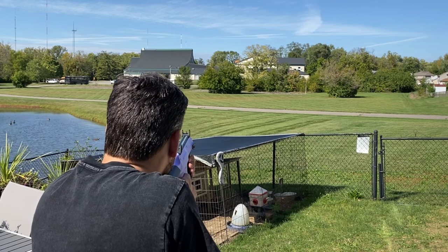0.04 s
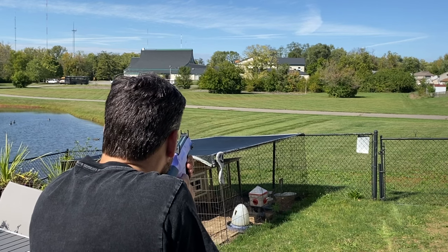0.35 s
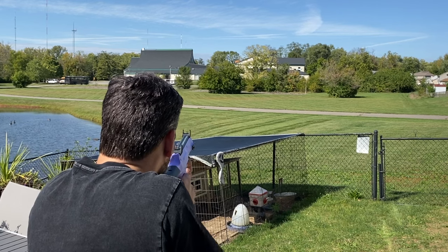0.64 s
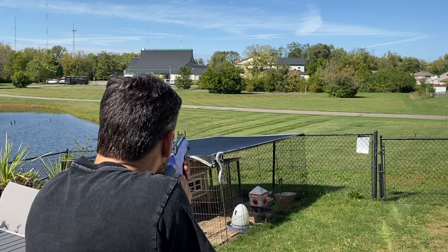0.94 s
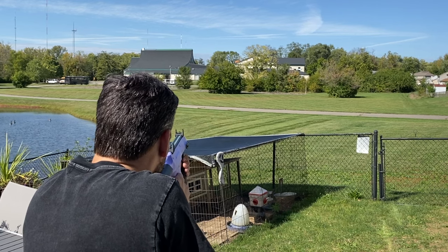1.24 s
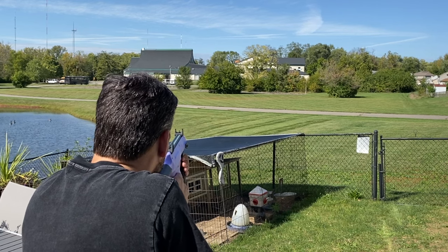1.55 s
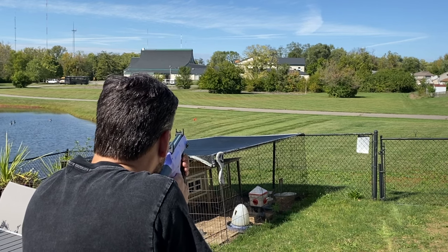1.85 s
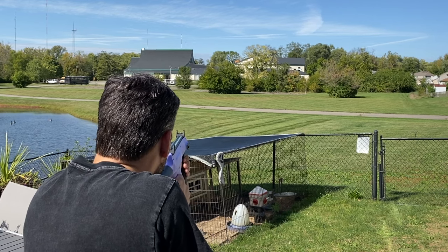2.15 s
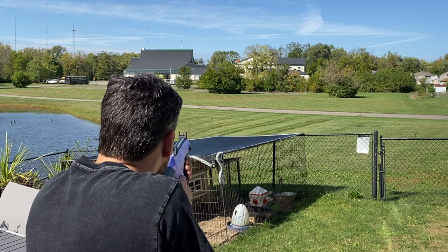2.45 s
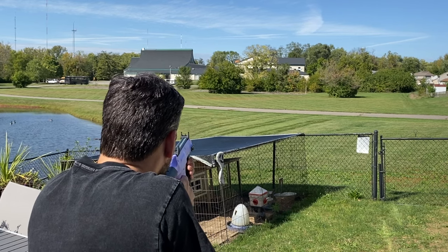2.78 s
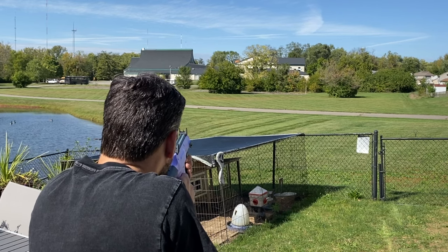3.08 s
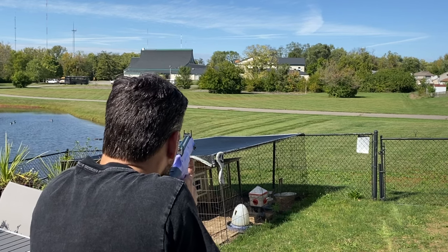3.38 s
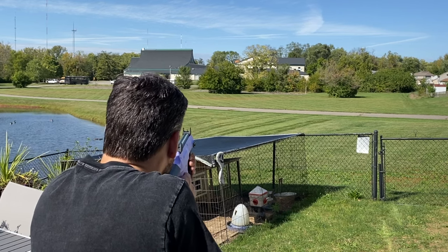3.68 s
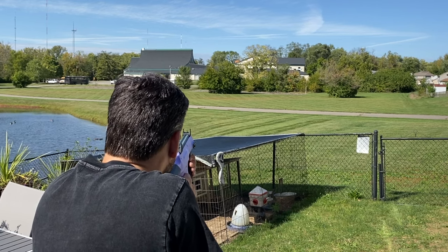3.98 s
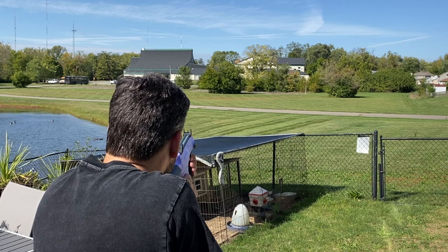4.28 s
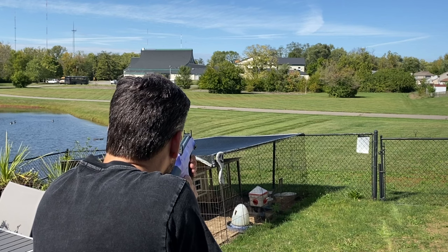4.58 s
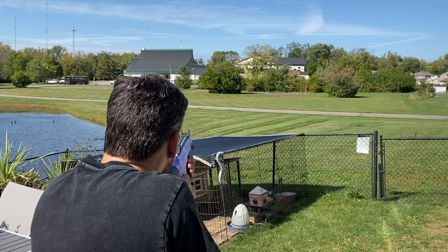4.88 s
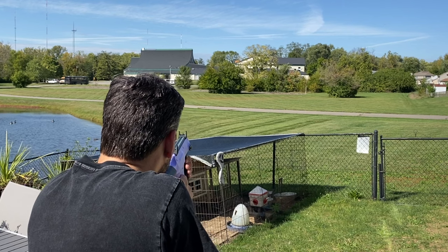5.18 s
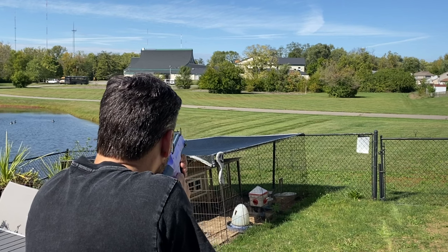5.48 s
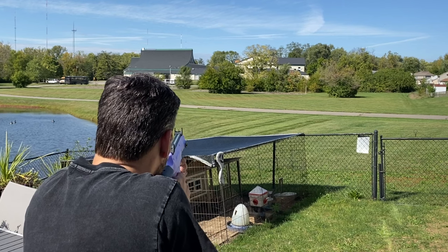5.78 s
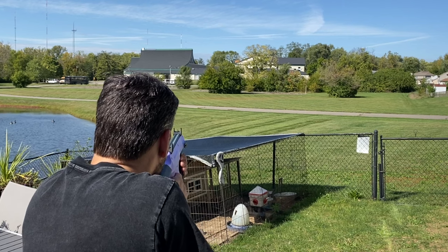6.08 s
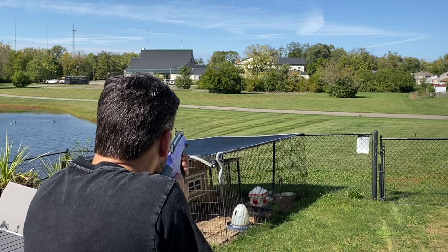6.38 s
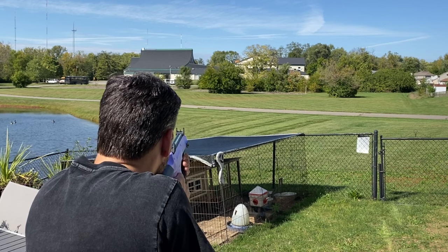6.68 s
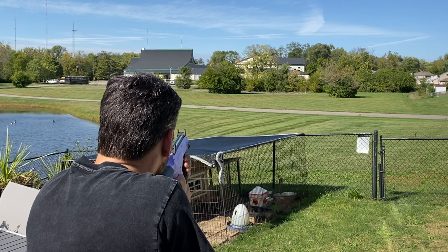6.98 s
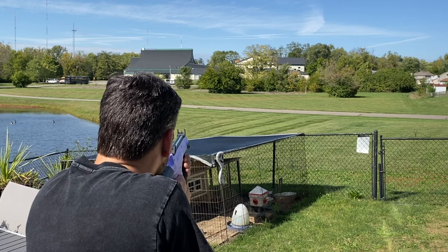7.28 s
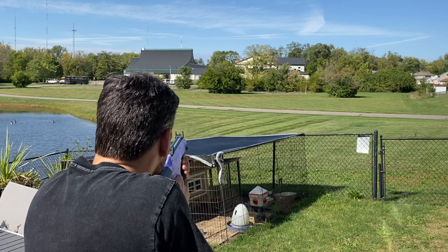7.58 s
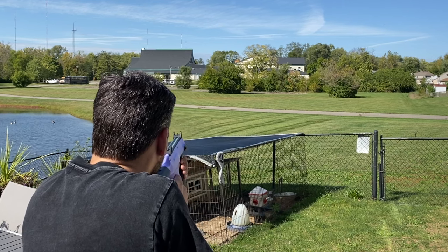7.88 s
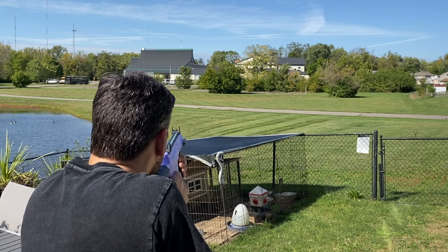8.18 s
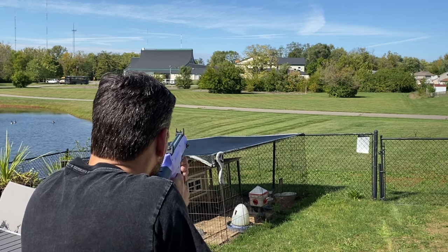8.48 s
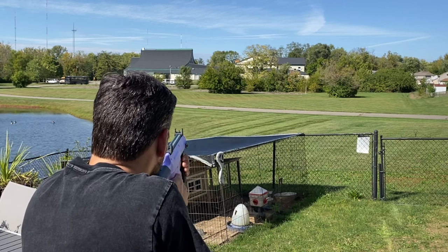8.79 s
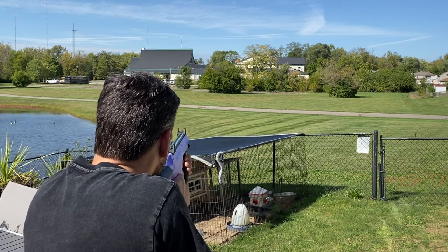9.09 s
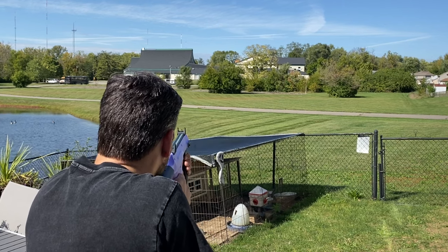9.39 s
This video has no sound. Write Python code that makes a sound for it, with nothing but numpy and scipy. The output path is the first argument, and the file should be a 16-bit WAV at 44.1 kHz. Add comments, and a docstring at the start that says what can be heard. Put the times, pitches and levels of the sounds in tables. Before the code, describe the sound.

Four rounds of a plastic toy blaster's slide clacking back and forward, each followed by a snapping, springy shot, outdoors.

```python
"""A spring-powered foam dart blaster is primed and fired four times, close by, on a quiet lawn.
Each time, the slide scrapes back, with a soft brush of the hand on the plastic, squeezes the spring
and latches. Two small catches click, and the slide runs home with a soft knock. On firing, the sear
(the catch that holds the spring) cracks free, the plunger thumps the hollow shell, and the spring
rattles and rings. After each of the first three shots, the trigger clicks back."""
import sys
import numpy as np
from scipy import signal
from scipy.fft import rfft, irfft
from scipy.io import wavfile
from scipy.ndimage import uniform_filter1d

SR = 44100
rng = np.random.default_rng(int(sys.argv[2]) if len(sys.argv) > 2 else 0)


def unload_audio(sound):
    """Save the sound as a 16-bit wav file, at the path given as the first command line argument."""
    columns = np.transpose(np.atleast_2d(sound))
    # keep every value between -1 and 1, then stretch to whole-number steps
    steps = np.round(np.clip(columns, -1, 1) * 32767)
    wavfile.write(sys.argv[1], SR, steps.astype(np.int16))


N = 425565


def gain_of(db):
    """Turns decibels into a number to multiply a sound by."""
    return 10 ** (np.asarray(db) / 20)


def unit_level(x):
    """Scales a signal to an average power of one."""
    return x / np.sqrt(np.mean(x ** 2) + 1e-20)


def level_at(tone, hz):
    """Joins the (f/Hz, level/dB) points of a tone curve with straight lines on a pitch scale."""
    f, db = np.transpose(tone)
    return np.interp(np.log(hz + 1), np.log(f + 1), db)


def add(mix, start, sound):
    """Lays a sound into the mix, starting at a time in seconds."""
    part = mix[max(round(start * SR), 0):][:len(sound)]
    part += sound[:len(part)]


def burst(hold, fall, tail_db=-26, tail=0.008, rise=0.00068):
    """Hard plastic parts chatter, then die away over faint nearby echoes; times are in seconds."""
    t = np.arange(SR // 10) / SR
    level = np.exp(-np.maximum(t - hold, 0) / fall) + gain_of(tail_db) * np.exp(-t / tail)
    level *= 1 - np.exp(-t / rise)
    chatter = rng.standard_normal(len(t)) * level
    # a hard hit feeds all frequencies about evenly
    flat = irfft(np.exp(1j * np.angle(rfft(chatter))), len(t))
    flat_level = np.sqrt(abs(uniform_filter1d(flat ** 2, size=64)) + 1e-15)
    return level * flat / flat_level


def stroke(rise, hold, fade_db_per_s, curve=1.3, tail_db=-30, tail_db_per_s=110):
    """The force on a sliding part builds, holds and fades, and loose parts whisper on."""
    t = np.arange(SR // 2) / SR
    build = np.minimum(t / rise, 1) ** curve
    fading = np.maximum(t - rise - hold, 0)
    return build * (gain_of(-fade_db_per_s * fading) + gain_of(tail_db - tail_db_per_s * fading))


def rub(force, slips_per_s, spread_db=2.5, hiss=0.39, uneven_db=1.9):
    """Rubbing is many tiny slips of uneven size over a smooth hiss; more force makes it louder."""
    noise, sign, grab = rng.standard_normal((3, SR))
    sizes = gain_of(spread_db * np.minimum(rng.exponential(1, SR), 3))
    slips = np.sign(sign) * sizes * (rng.random(SR) < slips_per_s / SR)
    # the surfaces grab and let go every few milliseconds
    grab_db = uneven_db * unit_level(uniform_filter1d(grab, size=140))
    friction = (unit_level(slips) + hiss * noise) * gain_of(grab_db)
    return unit_level(friction)[:len(force)] * force


def ring(notes, scatter_db=0, detune=0, low_hz=115):
    """A small struck body rings with little bass; each note falls 60 dB in its ring time."""
    t = np.arange(SR) / SR
    motion = np.zeros(SR)
    for hz, db, ring_s in notes:
        level_luck, pitch_luck = rng.standard_normal(2)
        level = gain_of(db + scatter_db * level_luck) * np.exp(-np.log(1000) * t / ring_s)
        motion += level * np.sin(2 * np.pi * hz * (1 + detune * pitch_luck) * t)
    return signal.sosfilt(signal.butter(2, low_hz, "highpass", fs=SR, output="sos"), motion)


# narrow bands that the plastic walls boost or weaken: f/Hz, width/Hz, level/dB
WALL_BANDS = [(1520, 65, 0), (2210, 240, 2.5), (2540, 140, 2.5), (2760, 140, -1), (4280, 310, 3.5),
              (4720, 160, 3.5), (5160, 180, 1.5), (7240, 270, 2), (6960, 390, 2.5), (7600, 200, 1.5),
              (8500, 260, 3), (9350, 160, 3.5)]

def colour(x, tone, peak_hz=1000, peak_db=0, octaves=0.9, size=4096):
    """Shapes a hit or rub by its tone curve, the broad peak of a small part, and the walls."""
    hz = abs(np.fft.fftfreq(size, 1 / SR))
    db = level_at(tone, hz) + peak_db * np.exp(-(np.log2((hz + 1) / peak_hz) / octaves) ** 2)
    db += sum(boost / (1 + (2 * (hz - centre) / width) ** 2) for centre, width, boost in WALL_BANDS)
    # a minimum-phase filter: nothing sounds before the hit
    response = np.exp(np.conj(signal.hilbert(np.log(gain_of(db)))))
    taps = np.fft.ifft(response).real[:size // 2]
    return signal.fftconvolve(x, taps / np.linalg.norm(taps))


# tone curve of distant wind and traffic: f/Hz, level/dB
AIR_TONE = [(15, -49.5), (30, -19.5), (55, -1.5), (127, -5), (185, -5), (290, -9.5), (503, -5.5), (714, -6),
            (1330, -12), (1840, -21), (3700, -33), (4800, -33.5), (6100, -41), (9300, -39), (10700, -43.5),
            (13600, -43), (16000, -55)]
# loudness of a far-off hum over time: t/s, level/dB
HUM_LEVELS = [(0, -74), (1.1, -79), (1.6, -72), (2.5, -75.5), (4.6, -88)]

def outdoors():
    """Distant wind and traffic make a soft, swaying wash, with a hum that sinks away."""
    t, hz = np.arange(N) / SR, np.fft.rfftfreq(N, 1 / SR)
    wash_db, hum_hz, hum_width_hz = -67, 606, 22
    shapes = gain_of(level_at(AIR_TONE, hz)), np.exp(-hz / 6), np.exp(-((hz - hum_hz) / hum_width_hz) ** 2)
    wash, sway, hum = (unit_level(irfft(rfft(rng.standard_normal(N)) * shape, N)) for shape in shapes)
    hum_db = np.interp(t, *np.transpose(HUM_LEVELS))
    return wash * gain_of(wash_db + 0.5 * sway) + hum * gain_of(hum_db)


# the hand shifts on the grip: t/s, length/s, level/dB
HAND_SHIFTS = [(2.33, 0.35, -87.5), (5.455, 0.1, -65), (7.439, 0.39, -81)]
# tone curve of skin on plastic: f/Hz, level/dB
SKIN_TONE = [(200, -16), (1500, 15), (4500, -4), (9000, 0), (12000, -8), (16000, -22)]

def hand():
    """Skin brushes the plastic in soft swells, when the hand shifts and during each pull of the slide."""
    out = np.zeros(N)
    pull_brushes = [(latch - 0.064, 0.17, -72.5) for latch, *_ in SLIDE_PULLS]
    for start, length, db in HAND_SHIFTS + pull_brushes:
        swell = np.sin(np.pi * np.arange(0, length, 1 / SR) / length)
        brush = rub(swell, slips_per_s=900, spread_db=6, hiss=0.9, uneven_db=2.5)
        add(out, start, gain_of(db) * colour(brush, SKIN_TONE))
    return out


# the trigger springs back: t/s, level/dB
TRIGGER_CLICKS = [(2.3027, -46), (4.752, -45), (7.4588, -39)]
# tone curves of scraping plastic and of the trigger's click: f/Hz, level/dB
SCRAPE_TONE = [(40, -20), (250, -9), (600, -2.5), (1300, 4), (1900, -1), (2700, 4), (3800, -3.5), (4900, 1),
               (6100, -6), (7300, -3), (10000, -6), (13000, -13), (16000, -25)]
TRIGGER_TONE = [(40, -43), (200, -45), (400, -33), (750, 0), (1100, 13.5), (1700, -2.5), (2200, 3),
                (3300, -2), (3750, -12), (4200, -8), (7000, -18.5), (16000, -31)]
# notes of the stiff grip and of the empty dart chamber: f/Hz, level/dB, ring time/s
GRIP_NOTES = [(226, -19.5, 0.0045), (365, -5, 0.013), (536, -4.5, 0.021), (717.2, -10.5, 0.0079),
              (1110, -11.5, 0.017)]
CHAMBER_NOTES = [(1060, -16, 0.052), (1380, -10, 0.052), (1703, -13.5, 0.055), (1900, -13.5, 0.033)]

def trigger():
    """The released trigger slides forward ever faster and clicks against its stop in the grip."""
    out = np.zeros(N)
    force = stroke(rise=0.034, hold=0.00068, fade_db_per_s=2500, curve=3.2, tail_db=-29, tail_db_per_s=200)
    for at, db in TRIGGER_CLICKS:
        scrape = colour(rub(force, slips_per_s=2500, hiss=0.7), SCRAPE_TONE, peak_hz=2400, peak_db=7.5)
        add(out, at - 0.039, gain_of(db - 15.5) * scrape)
        hit = burst(hold=0.0032, fall=0.0014, tail_db=-13, tail=0.01, rise=0.00032)
        add(out, at, gain_of(db) * colour(hit, TRIGGER_TONE, peak_hz=4200, peak_db=2.5))
        add(out, at + 0.00202, gain_of(db - 1) * ring(GRIP_NOTES, low_hz=330))
        add(out, at + 0.00188, gain_of(db + 5) * ring(CHAMBER_NOTES, scatter_db=0.5, detune=0.022))
    return out


# tone curve of a small part clicking: f/Hz, level/dB
CLICK_TONE = [(40, -8.5), (200, -2), (400, -9.5), (1000, 0), (1900, -3.5), (3000, 5), (3700, -3.5),
              (4700, 1.5), (6500, -1.5), (9000, -4), (12000, -12), (16000, -26)]

def click(db, peak_hz, peak_db):
    """A small part drops into place, with a broad peak at its own pitch."""
    hit = burst(hold=0.0012, fall=0.0014, tail_db=-17.5, tail=0.0046)
    return gain_of(db) * colour(hit, CLICK_TONE, peak_hz, peak_db)


# stray clicks: t/s, level/dB, peak f/Hz, peak boost/dB
PLASTIC_SNAGS = [(0.606, -28, 4010, 7), (1.306, -58, 1210, 33), (3.086, -45, 1200, 13.5),
                 (3.139, -27.5, 4980, 3), (3.148, -29, 2790, 5), (8.17, -50.5, 1160, 33.5)]

def snags():
    """Now and then the plastic snags and clicks."""
    out = np.zeros(N)
    for at, db, peak_hz, peak_db in PLASTIC_SNAGS:
        add(out, at, click(db, peak_hz, peak_db))
    return out


# two catches drop in: t/s, tick level/dB, wait for the clack/s, clack level/dB
CATCH_DROPS = [(0.844, -43, 0.036, -33.5), (3.385, -41.5, 0.025, -32.5), (5.8494, -39.5, .0184, -35),
               (8.446, -37.5, 0.021, -33.5)]

def catches():
    """With the slide fully back, a light catch ticks; a heavy one clacks and rings the chamber."""
    out = np.zeros(N)
    for at, tick_db, wait, clack_db in CATCH_DROPS:
        add(out, at - 0.0058, click(db=-60, peak_hz=4000, peak_db=1))  # it grazes its edge first
        add(out, at, click(tick_db, peak_hz=3020, peak_db=1))
        add(out, at + wait, click(clack_db, peak_hz=1625, peak_db=14))
        add(out, at + wait, gain_of(clack_db - 4) * ring(CHAMBER_NOTES, scatter_db=4, detune=0.018))
    return out


# the slide arrives home: t/s, knock level/dB, thud delay/s, then level/dB of thud, glide and bump
SLIDE_RETURNS = [(0.9875, -38, 0.00065, -28, -48.5, -37), (3.516, -36, 0.0043, -28.5, -49, -58),
                 (5.9716, -37.5, 0.00544, -34, -49, -43.5), (8.586, -36.5, 0.003, -33, -49.5, -48)]
# tone curves of the glide and the knock: f/Hz, level/dB
GLIDE_TONE = [(40, -27), (250, -8), (560, 5.5), (900, -3), (1300, 4.5), (2000, -1), (2750, 10), (3650, -1),
              (4800, 5), (6700, -4), (9800, 0.5), (13000, -4.5), (16000, -15)]
KNOCK_TONE = [(40, -6), (130, 0.5), (280, 6), (600, 0), (950, 4.5), (2000, -3.5), (2800, -9), (3600, -18),
              (4800, -11), (7000, -65), (16000, -27)]
# notes of the hollow shell: f/Hz, level/dB, ring time/s
SHELL_NOTES = [(206, -5, .045), (293, -4, 0.072), (310, -11.5, 0.13), (402, 0, 0.04), (605, -13, 0.04),
               (817, -12, 0.035), (941.3, 1, 0.057), (1015, -6.5, 0.017), (1300, -12.5, 0.0088),
               (1466, -13, 0.052)]

def slide_return():
    """The slide glides forward with a small bump on the way and knocks softly on the shell."""
    out = np.zeros(N)
    force = stroke(rise=0.042, hold=0.057, fade_db_per_s=680, curve=2.1, tail_db=-23, tail_db_per_s=87)
    # a soft blow wakes only the lowest notes, and the hand cuts them short
    held_shell = [(hz, db, ring_s * 0.53) for hz, db, ring_s in SHELL_NOTES[:2]]
    for at, knock_db, delay, thud_db, glide_db, bump_db in SLIDE_RETURNS:
        glide = rub(force, slips_per_s=1400, spread_db=3.5, hiss=0.63, uneven_db=1.5)
        add(out, at - 0.09, gain_of(glide_db) * colour(glide, GLIDE_TONE))
        add(out, at - 0.044, click(bump_db, peak_hz=835, peak_db=14))
        knock = burst(hold=0.0051, fall=0.0056, tail_db=-16.5, tail=0.033)
        add(out, at, gain_of(knock_db) * colour(knock, KNOCK_TONE))
        add(out, at + delay, -gain_of(thud_db) * ring(held_shell, detune=0.078))
    return out


# the spring's three main notes: f/Hz, ring time/s
SPRING_NOTES = [(1392, .42), (4445, .55), (5706, .53)]
# its lesser notes: f/Hz, level/dB, ring time/s
SPRING_LESSER_NOTES = [(1653, -10, .6), (1760, -18, 1.0), (2562, -21, .6), (2735, -19, .9),
                       (3042, -12.5, .55), (3429, -11, .45), (3833, -16, .38)]

def spring(main_dbs, lesser_db):
    """The steel coil rings on; where it is struck decides how loud each main note is."""
    notes = [(hz, db, ring_s) for (hz, ring_s), db in zip(SPRING_NOTES, main_dbs)]
    # it bends in two directions at slightly different pitches, so its notes waver
    wavering = ring(notes) + gain_of(-12) * ring(notes, detune=0.002)
    return wavering + gain_of(lesser_db) * ring(SPRING_LESSER_NOTES, scatter_db=2)


# the slide latches: t/s, level/dB of latch, thud, scrape and shudder,
# time from picking up the plunger to the latch/s, level/dB of each main spring note
SLIDE_PULLS = [(0.6123, -14.5, -18.5, -32.5, -40.5, 0.057, -63, -67.5, -74.5),
               (3.1537, -14, -15, -33, -38.5, 0.055, -69, -72, -62.5),
               (5.5713, -14.5, -23.5, -33.5, -40, .061, -65, -75, -66),
               (8.258, -14.5, -23.5, -31.5, -41.5, .056, -64, -68, -66)]
# tone curves of the latch and the shuddering shell: f/Hz, level/dB
LATCH_TONE = [(40, -20), (130, -18), (330, -10.5), (620, -4), (850, 5), (1300, 5.5), (1900, -7.5),
              (3000, 4.5), (3800, -6), (4900, 4), (8000, -3.5), (11000, -4), (16000, -20.5)]
SHUDDER_TONE = [(25, -11), (60, -2.5), (200, -13.5), (600, -9.5), (760, -8), (880, 1.5), (1080, -6.5),
                (1270, 3.5), (1700, -7), (2700, -8), (3800, -21.5), (4600, -14.5), (8000, -24),
                (16000, -43)]

def slide_pull():
    """The slide scrapes harder as it squeezes the spring, then latches and shakes the shell."""
    out = np.zeros(N)
    pull = stroke(rise=0.07, hold=0.0014, fade_db_per_s=520, curve=1.7, tail_db=-36.5, tail_db_per_s=90.5)
    shake = stroke(rise=0.00066, hold=0.019, fade_db_per_s=680, tail_db_per_s=99)
    for at, latch_db, thud_db, scrape_db, shudder_db, pickup_lead, *spring_dbs in SLIDE_PULLS:
        scrape = rub(pull, slips_per_s=3800, spread_db=3, hiss=0.87, uneven_db=2)
        add(out, at - 0.081, gain_of(scrape_db) * colour(scrape, SCRAPE_TONE))
        add(out, at - pickup_lead, click(db=-37.5, peak_hz=2400, peak_db=7))
        latch = burst(hold=0.0022, fall=0.0015, tail_db=-29.5, tail=0.006)
        add(out, at, gain_of(latch_db) * colour(latch, LATCH_TONE))
        add(out, at + 0.0018, -gain_of(thud_db) * ring(GRIP_NOTES, detune=0.012, low_hz=235))
        shudder = rub(shake, slips_per_s=3800, hiss=0.96)
        add(out, at + 0.004, gain_of(shudder_db) * colour(shudder, SHUDDER_TONE))
        add(out, at, spring(spring_dbs, lesser_db=-62))
    return out


# tone curve of the rattling spring: f/Hz, level/dB
RATTLE_TONE = [(40, -11), (200, -9), (500, -3), (1000, -0.5), (1400, 3.5), (1900, -2), (2650, 4.5),
               (3700, -3), (4700, 1.5), (7000, -0.5), (9500, -4), (12000, -10), (16000, -25.5)]

def spring_rattle(length, rise=0.0093, settle=0.0056):
    """The freed spring chatters; its blows weaken steadily until it comes gently to rest."""
    t = np.arange(SR // 4) / SR
    time_left = settle * np.logaddexp(0, (length - t) / settle)
    force = (1 - np.exp(-t / rise)) * time_left / length
    return colour(rub(force, slips_per_s=5000, spread_db=0.36, hiss=0.9, uneven_db=1.3), RATTLE_TONE)


# the shots: t/s, crack level/dB, plunger travel/s, thump level/dB, rattle level/dB,
# rattle length/s, level/dB of each main spring note
SHOT_EVENTS = [(1.8449, -19.5, 0.017, -18.5, -23, 0.1, -49, -69.5, -49.5),
               (4.3180, -18.5, .0168, -18, -22, 0.08, -50, -68.5, -53),
               (6.8841, -18, .0185, -17.5, -23, 0.11, -39.5, -52.5, -49.5),
               (9.512, -18.5, 0.019, -17.5, -22.5, 0.1, -49, -67, -47.5)]
# tone curve of the sharp crack: f/Hz, level/dB
CRACK_TONE = [(40, -18.5), (200, -11.5), (600, -2.5), (1200, 0), (1900, -9), (2550, 3.5), (3500, -5),
              (4800, -3), (7500, -0.5), (10000, -4), (13000, -11), (16000, -19.5)]

def firing():
    """The sear lets go, the grip kicks, and the plunger hits the end of its tube and bounces once."""
    out = np.zeros(N)
    for at, crack_db, travel, thump_db, rattle_db, rattle_s, *spring_dbs in SHOT_EVENTS:
        crack = burst(hold=0.0042, fall=0.003, tail_db=-25.5, tail=0.0087, rise=0.00017)
        add(out, at, gain_of(crack_db) * colour(crack, CRACK_TONE))
        kick = ring(GRIP_NOTES, scatter_db=1.5, detune=0.016)
        add(out, at + 0.0056, -gain_of(thump_db + 3) * kick)
        # the full blow shakes the whole shell, the bounce only the grip
        blows = [(travel, SHELL_NOTES, 0.6, -9), (travel + 0.009, GRIP_NOTES, -2, -6)]
        for delay, notes, blow_db, clack_db in blows:
            add(out, at + delay, -gain_of(thump_db + blow_db) * ring(notes, scatter_db=2, detune=0.011))
            clack = colour(burst(hold=0.00097, fall=0.0015), CRACK_TONE)
            add(out, at + delay + 0.0009, gain_of(crack_db + clack_db) * clack)
        add(out, at, gain_of(rattle_db) * spring_rattle(rattle_s))
        add(out, at, spring(spring_dbs, lesser_db=-53))
    return out


def scene():
    """The open air and the blaster, together in one channel."""
    return (outdoors() + hand() + trigger() + snags() + catches()
            + slide_return() + slide_pull() + firing())[None]


def record(dry):
    """Rounds off the loudest peaks, then cuts the very highest treble."""
    ceiling, top_hz = 0.28, 16000
    rounded = dry / (1 + (dry / ceiling) ** 4) ** (1 / 4)
    lowpass = signal.firwin(511, top_hz, window=("kaiser", 9), fs=SR)
    return signal.oaconvolve(rounded, lowpass[None], "same")


dry = scene()
out = record(dry)
unload_audio(out)
```